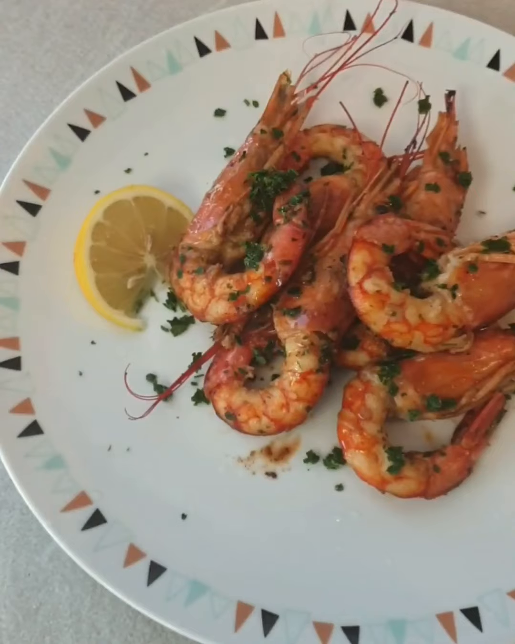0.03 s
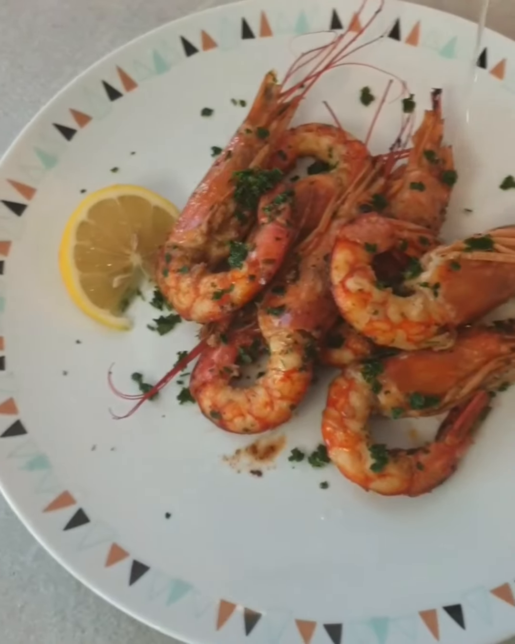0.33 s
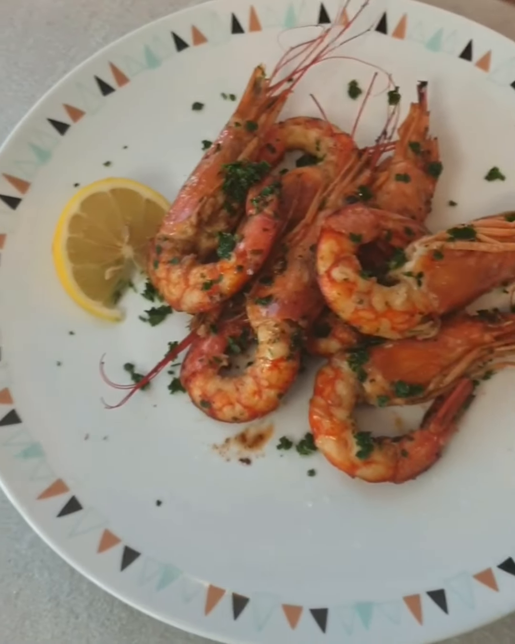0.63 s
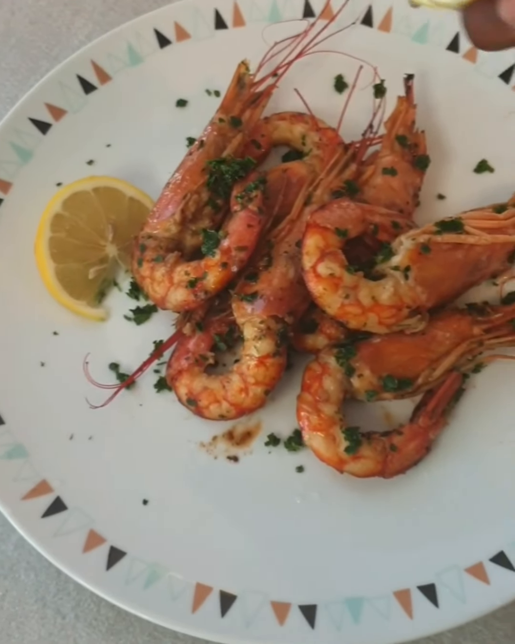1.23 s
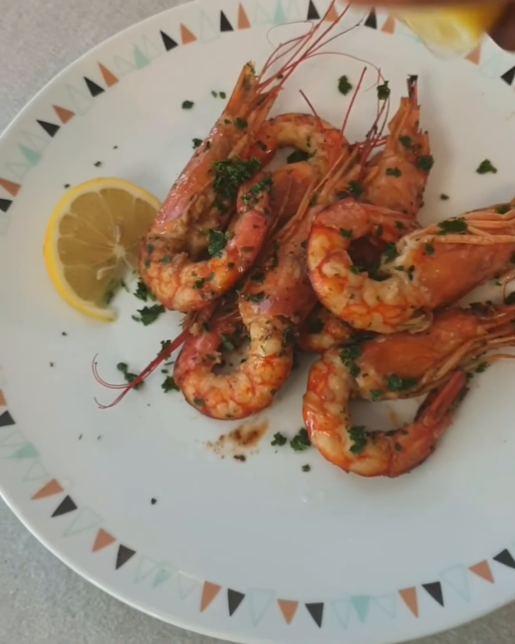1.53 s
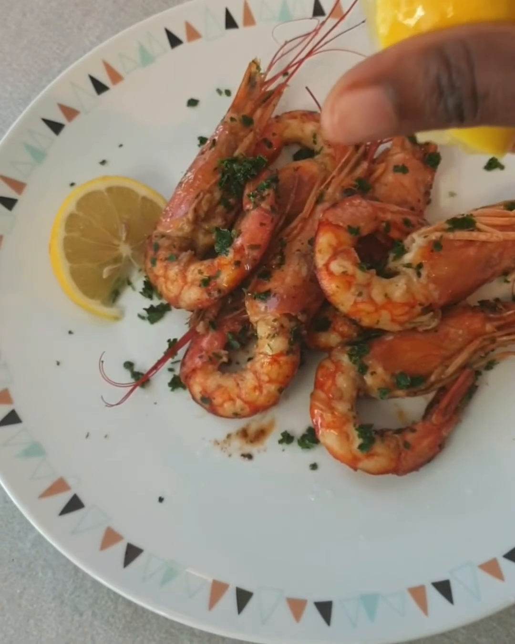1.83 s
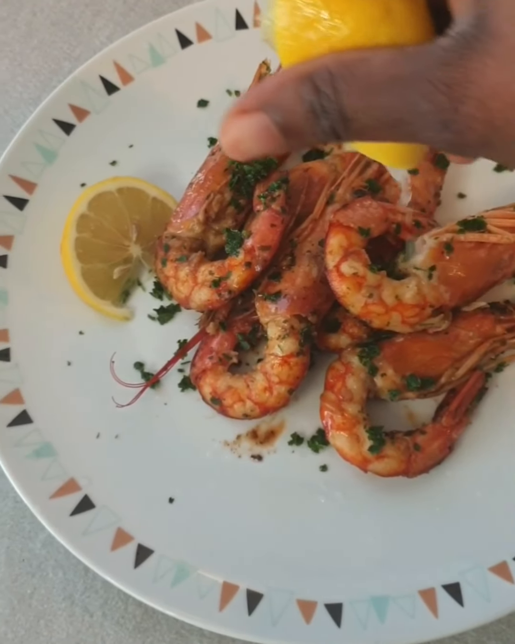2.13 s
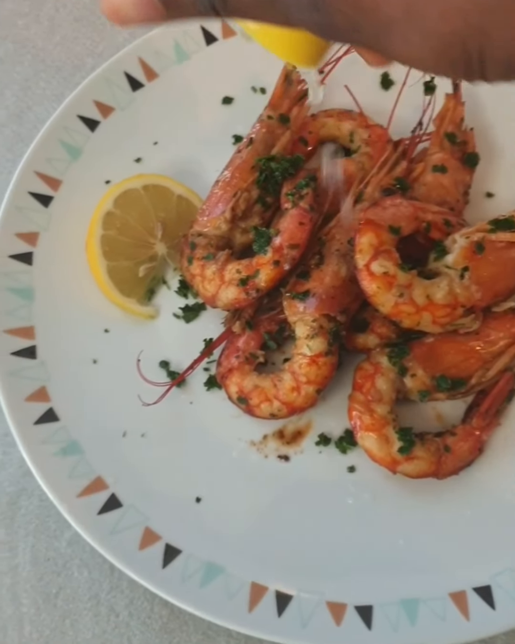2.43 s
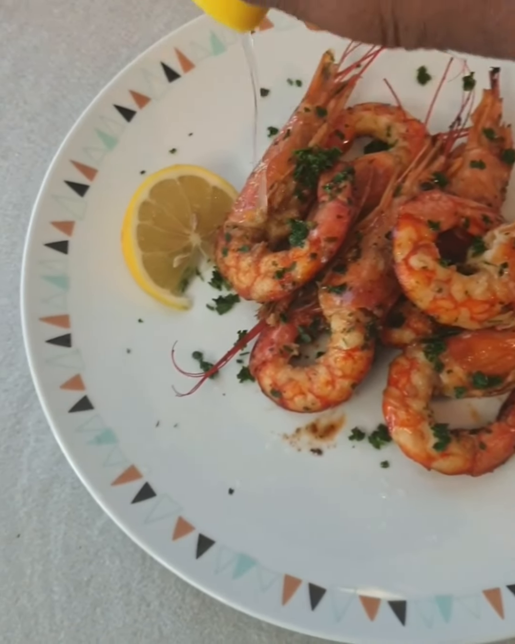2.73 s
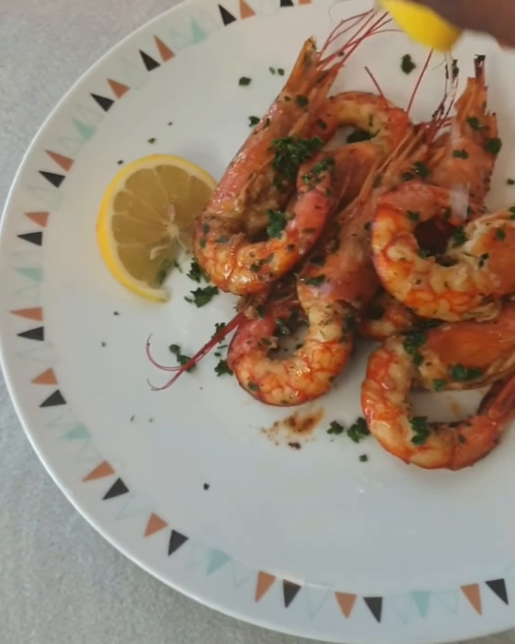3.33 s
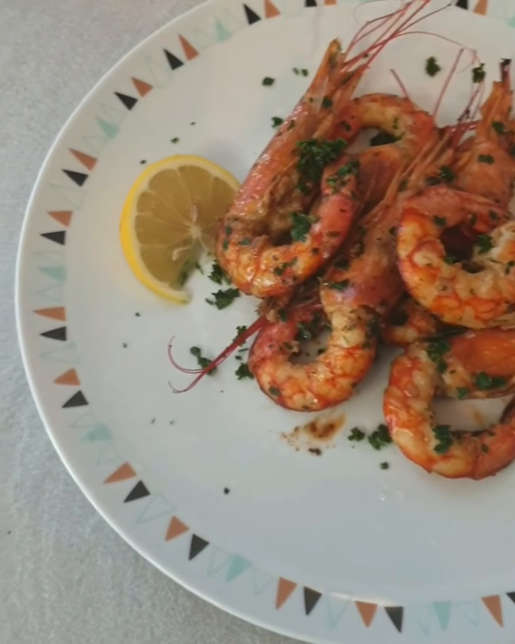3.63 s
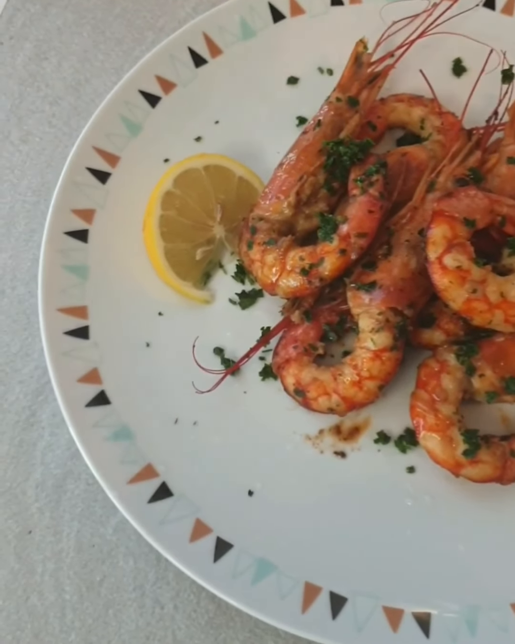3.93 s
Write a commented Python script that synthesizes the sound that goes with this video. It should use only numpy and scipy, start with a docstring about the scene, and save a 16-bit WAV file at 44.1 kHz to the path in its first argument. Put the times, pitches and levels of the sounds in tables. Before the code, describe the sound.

A lemon is squeezed by hand, close up in a quiet kitchen. A short wet spit and pop comes at about 0.9 seconds. From 1.8 to 2.8 seconds the pulp squishes and fizzes softly, with sharper spits near 2.2 and 2.5 seconds and a soft handling bump. A faint trickle and small drips then tick on the food until about 3.8 seconds. A low appliance hum runs throughout.

```python
"""Half a lemon is squeezed by hand over a plate of prawns, close-miked in a quiet kitchen.
Juice cells burst in sharp spits, air and juice fizz through the pulp, and air pockets pop.
Fingers rub the peel and small drops tick on the food; a soft handling rumble and a thin trickle
follow the hardest squeeze. An appliance motor hums throughout over faint room tone."""
import sys
import numpy as np
from scipy import signal
from scipy.fft import rfft, irfft
from scipy.io import wavfile
from scipy.ndimage import uniform_filter1d

SR = 44100
rng = np.random.default_rng(int(sys.argv[2]) if len(sys.argv) > 2 else 0)


def log_audio(samples):
    """Write samples as a 16-bit WAV file to the path given in sys.argv[1]."""
    # one column per channel
    frames = np.atleast_2d(samples).T
    # limit to full scale, then quantise
    limited = np.clip(frames, -1, 1)
    pcm = np.round(limited * 32767).astype(np.int16)
    wavfile.write(sys.argv[1], SR, pcm)


N = 176400


def amp(db):
    """Decibels to gain."""
    return 10 ** (np.asarray(db) / 20)


def unit(x):
    """Scales to rms 1."""
    return x / np.sqrt(np.mean(x ** 2) + 1e-20)


def curve_at(points, hz):
    """Reads a breakpoint curve on a log-frequency axis."""
    point_hz, value = np.transpose(points)
    return np.interp(np.log(hz + 1), np.log(point_hz + 1), value)


def add(mix, start_s, sound, pan_db=0):
    """Places a sound in the mix; positive pan_db leans left."""
    at = round(start_s * SR)
    sound = (sound * amp([[pan_db / 2], [-pan_db / 2]]))[:, max(-at, 0):]
    part = mix[:, max(at, 0):][:, :sound.shape[1]]
    part += sound[:, :part.shape[1]]


def drift(size, step_s):
    """A random modulator that glides to a new value each step."""
    steps = np.arange(size) / SR / step_s
    return np.interp(steps, np.arange(2048), rng.standard_normal(2048))


def stereo(x, likeness=0.24):
    """Blends two unrelated noises into a partly alike left and right."""
    return np.array([x[0], likeness * x[0] + np.sqrt(1 - likeness ** 2) * x[1]])


def resonate(x, centre_hz, width_oct, skirt_db):
    """A resonant peak on a broad skirt that reaches further upward; output at rms 1."""
    hz = np.fft.rfftfreq(x.shape[1], 1 / SR) + 1
    offset_oct = np.log2(hz / centre_hz)
    skirt_oct = np.where(offset_oct > 0, 1.57, 1)
    peak = np.exp(-0.5 * (offset_oct / width_oct) ** 2)
    skirt = amp(skirt_db) * np.exp(-0.5 * (offset_oct / skirt_oct) ** 2)
    return unit(irfft(rfft(x) * (peak + skirt), x.shape[1]))


def spit(centre_hz, width_oct, skirt_db, rise_s, decay_s):
    """A tiny spray of resonant noise: sharp attack, quick decay."""
    t = np.arange(4096) / SR
    envelope = (1 - np.exp(-t / rise_s)) * np.exp(-t / decay_s)
    noise = stereo(rng.standard_normal((2, len(t))))
    return envelope / envelope.max() * resonate(noise, centre_hz, width_oct, skirt_db)


def swell(length_s, skew=1):
    """An arched envelope; skew below 1 brings the crest earlier."""
    return np.sin(np.pi * np.linspace(0, 1, round(length_s * SR)) ** skew)


def motor_hum(shaft_hz=49.37, wander=0.0006, waver_db=0.82):
    """Harmonics of one slightly wandering shaft speed; the upper ones waver more in level."""
    # Hum partials: harmonic, level_db, pan_db
    partials = [(1, -45, 2.06), (2, -60.5, -1.6), (3, -82.5, 8.5), (4, -75, 9.5), (5, -86.5, -12.5),
                (6, -89, -1.5), (12, -81, 4), (13, -92, 8), (14, -96, 11.5)]
    turns = np.cumsum(shaft_hz * (1 + wander * drift(N, step_s=0.312))) / SR
    out = np.zeros((2, N))
    for harmonic, level_db, pan_db in partials:
        level = amp(level_db + waver_db * np.sqrt(harmonic) * drift(N, step_s=0.16))
        tone = np.sqrt(2) * np.cos(2 * np.pi * (harmonic * turns + rng.random()))
        add(out, 0, level * tone, pan_db)
    return out


def room_tone(level_db=-63.5, patch_db=1.0, pan_db=1.2):
    """Room rumble and faint hiss, with patches of the spectrum drifting in level."""
    # Tone colour of the room: frequency_hz, relative_db
    colour = [(20, -0.5), (45, 5.5), (70, 8), (120, 0), (170, -6), (290, -8.5), (440, -20), (600, -15),
              (760, -22.5), (1100, -24), (3000, -27), (7400, -35), (12000, -27.5), (16000, -30)]
    # How alike left and right are: frequency_hz, likeness (0 to 1)
    image = [(30, 1), (120, 0.35), (300, 0.73), (600, 0.17), (1500, 0.1), (5000, 0.1), (15000, 0.1)]
    hz = np.fft.rfftfreq(2048, 1 / SR)[:, None]
    re_a, im_a, re_b, im_b, patches = rng.standard_normal((N // 512 + 5, len(hz), 5)).T
    patches = uniform_filter1d(patches, size=12, axis=0)  # smooth across frequency
    patches = unit(uniform_filter1d(patches, size=8, axis=1))  # then across time
    spectra = stereo([re_a + 1j * im_a, re_b + 1j * im_b], curve_at(image, hz))
    spectra *= amp(curve_at(colour, hz) + patch_db * patches)
    wash = signal.istft(spectra, nperseg=2048, noverlap=1536)[1][:, :N]
    return amp(level_db) * unit(wash) * amp([[pan_db / 2], [-pan_db / 2]])


def finger_rubs(flutter_db=2.5):
    """Fingers rub and squeak softly on the peel in fluttering swells."""
    # Strokes on the peel: start_s, length_s, level_db, centre_hz, width_oct, pan_db
    strokes = [(-.08, .33, -72.5, 2464, 0.063, 4.5), (-.05, 0.16, -74, 620, 0.097, 0),
               (0.658, 0.057, -76, 2530, 0.036, 5), (0.902, 0.23, -70.5, 440, 1, -1),
               (.96, 0.08, -72.5, 884, 0.032, -17), (0.978, 0.42, -79.5, 876, 0.14, -13.5),
               (1.723, 0.84, -70.5, 586, 0.29, -1), (1.948, 0.21, -77, 1680, 0.44, 15),
               (2.15, 0.055, -66, 700, 0.26, -9), (2.489, 0.058, -70.5, 367, 0.85, 5),
               (2.976, 0.15, -76.5, 574, 0.38, -1), (3.181, 0.18, -74, 302, 0.27, -3)]
    out = np.zeros((2, N))
    for start_s, length_s, level_db, centre_hz, width_oct, pan_db in strokes:
        friction = stereo(rng.standard_normal((2, SR)), likeness=0.42)
        rub = resonate(friction, centre_hz, width_oct, skirt_db=-30)
        envelope = swell(length_s, skew=0.69)
        envelope *= amp(level_db + flutter_db * drift(len(envelope), step_s=0.013))
        add(out, start_s, envelope * rub[:, :len(envelope)], pan_db)
    return out


def pulp_fizz(clicks_per_s=3200, spread_db=2.6, fizz_gain=0.99, clump_db=2.4):
    """Air and juice forced through the pulp: clumped micro-clicks and fizz swell with each press."""
    # Squishes: start_s, length_s, level_db, centre_hz, width_oct, pan_db
    squishes = [(.06, .12, -73.5, 2470, 0.24, 6.5), (.08, 0.25, -83, 11100, 0.17, 15),
                (0.915, 0.12, -66, 8900, 1, 2), (0.928, 0.093, -71, 2470, 0.17, 20),
                (1.799, 0.63, -77, 1810, 0.88, 4), (1.849, 0.39, -77, 10700, 0.75, 3),
                (1.968, .07, -69, 4640, 0.31, 4), (2.028, 0.073, -66.5, 3060, 0.26, 10.5),
                (1.992, 0.14, -70.5, 4350, .7, 4), (2.172, 0.14, -74, 4530, 0.89, 16),
                (2.193, 0.28, -66, 10500, 0.3, 0), (2.269, 0.12, -66, 9400, 0.14, 14.5),
                (2.288, 0.17, -69, 5400, .5, -0.5), (2.19, 0.35, -77, 2250, 0.7, 6),
                (2.515, .07, -67.5, 4650, 0.89, 6.5), (2.506, .17, -88, 11200, 0.3, 1),
                (2.556, 0.25, -74, 5150, 1, 8.5), (2.887, .1, -77.5, 5930, 0.21, -4),
                (2.948, 0.63, -83, 11200, 0.86, 6)]
    out = np.zeros((2, N))
    for start_s, length_s, level_db, centre_hz, width_oct, pan_db in squishes:
        hits = rng.random(SR) < clicks_per_s / SR
        strength = amp(spread_db * np.minimum(rng.exponential(1, SR), 4))
        clicks = unit(hits * strength * rng.choice([-1, 1], (2, SR)))
        fizz = fizz_gain * rng.standard_normal((2, SR))
        clumps = amp(clump_db * drift(SR, step_s=0.011))
        squish = resonate(stereo((clicks + fizz) * clumps), centre_hz, width_oct, skirt_db=-31.5)
        envelope = amp(level_db) * swell(length_s, skew=0.63)
        add(out, start_s, envelope * squish[:, :len(envelope)], pan_db)
    return out


def drop_ticks():
    """Single small drops tick on the food."""
    # Drops landing: start_s, level_db, centre_hz, pan_db
    landings = [(.304, -75.5, 5850, -5), (0.504, -68, 12000, 2), (.678, -77, 2350, 3),
                (1.2547, -64, 8360, 14), (1.876, -78, 3380, 2), (1.935, -71, 8300, 18),
                (2.7482, -58.5, 11300, -2), (2.748, -62.5, 5400, -9), (2.8704, -62, 8800, 20),
                (2.8893, -65.5, 6540, 12), (2.9754, -68, 7000, 10), (3.0246, -75, 12900, 2),
                (3.071, -64, 11300, 0), (3.149, -77, 8700, 17), (3.2755, -65, 6290, -1),
                (3.314, -65.5, 9700, 4), (3.512, -72.5, 8100, 18), (3.66, -63, 12100, 0),
                (3.773, -74, 8400, 14), (3.7838, -70, 8000, 13)]
    out = np.zeros((2, N))
    for start_s, level_db, centre_hz, pan_db in landings:
        tick = spit(centre_hz, width_oct=0.14, skirt_db=-23, rise_s=0.00027, decay_s=0.0018)
        add(out, start_s, amp(level_db) * tick, pan_db)
    return out


def juice_bursts():
    """Juice cells burst under the fingers, each with a sharp spit."""
    # Bursting cells: start_s, level_db, decay_s, centre_hz, width_oct, skirt_db, pan_db
    cells = [(0.9034, -63, 0.0089, 5800, 1, -16, 10), (.9168, -48, 0.0048, 12200, 0.89, 5, 5),
             (.917, -50, 0.002, 2610, 0.13, -12, 9), (0.9243, -50, 0.0027, 4960, 0.67, -6, 8),
             (1.6071, -65.5, .002, 1250, 0.36, -15, -5), (2.007, -55, 0.0078, 5900, 0.3, -12, 2),
             (2.1671, -44.5, 0.002, 6460, 0.076, 3, 1), (2.1805, -47, 0.0048, 4400, 0.45, -13, 4),
             (2.181, -52.5, 0.0028, 1820, 0.24, -12, 5.5), (2.3304, -56, 0.0055, 9100, 0.12, -11, 11),
             (2.395, -61.5, 0.0018, 12200, 0.33, -11, 21), (2.4008, -57, 0.0046, 10000, 0.58, -9, 5),
             (2.497, -64, 0.0036, 9200, 0.68, -12, 0), (2.5, -43.5, 0.0021, 11900, 0.16, -9, -1),
             (2.501, -52, 0.0022, 4670, 0.39, -14, 1.5), (2.5684, -58, 0.012, 5300, .15, -15, 0.5),
             (2.6527, -54.5, .003, 5400, 0.13, -5, 3), (2.6916, -62.5, .008, 6900, .6, -12, 6)]
    out = np.zeros((2, N))
    for start_s, level_db, decay_s, centre_hz, width_oct, skirt_db, pan_db in cells:
        burst = spit(centre_hz, width_oct, skirt_db, rise_s=0.00015, decay_s=decay_s)
        add(out, start_s, amp(level_db) * burst, pan_db)
    return out


def bubble_pops(glide=0.068, rasp_gain=0.14):
    """Air pockets in the pulp pop and ring briefly, rising slightly in pitch."""
    # Air pockets: start_s, level_db, pitch_hz, length_s, pan_db
    pockets = [(.9432, -44, 2500, 0.0037, 4), (0.9434, -62, 1680, 0.0042, 16), (1.256, -84, 8160, 0.023, 9),
               (1.605, -67.5, 1400, 0.0087, 11), (1.985, -60, 4460, 0.0092, 7),
               (2.006, -62, 2780, 0.016, 10), (2.053, -57, 3300, 0.0046, 8),
               (2.158, -55, 4420, 0.0088, 6.5), (2.1784, -43, 2395, 0.0057, 10.5),
               (2.568, -60, 5660, 0.013, -11), (2.655, -71.5, 3870, .03, 19)]
    out = np.zeros((2, N))
    for start_s, level_db, pitch_hz, length_s, pan_db in pockets:
        envelope = amp(level_db) * swell(length_s)
        rising_hz = pitch_hz * (1 + glide * np.linspace(-0.5, 0.5, len(envelope)))
        tone = np.sin(2 * np.pi * np.cumsum(rising_hz) / SR)
        rasp = resonate(rng.standard_normal((2, SR // 10)), pitch_hz, width_oct=0.27, skirt_db=-16)
        add(out, start_s, envelope * (tone + rasp_gain * rasp[:, :len(tone)]), pan_db)
    return out


def handling_rumble():
    """Soft low bumps, nearly mono, as the hand shifts."""
    # Handling bumps: start_s, length_s, level_db, centre_hz
    bumps = [(2.5, 0.13, -61, 190), (2.54, 0.13, -51, 93), (2.62, 0.13, -61, 128), (2.8, 0.038, -54, 117)]
    out = np.zeros((2, N))
    for start_s, length_s, level_db, centre_hz in bumps:
        noise = stereo(rng.standard_normal((2, SR)), likeness=0.97)
        thud = resonate(noise, centre_hz, width_oct=0.4, skirt_db=-22.5)
        envelope = amp(level_db) * swell(length_s)
        add(out, start_s, envelope * thud[:, :len(envelope)], pan_db=0.5)
    return out


def trickle(count=133, around_s=3.19, spread_s=0.39, level_db=-79.5, pitch_hz=6340, decay_s=0.0024):
    """A thin trickle on the food: faint pings from droplets of nearly one size."""
    out = np.zeros((2, N))
    t = np.arange(1024) / SR
    for when, offset_db, detune, side in rng.uniform(-1.1, 1, (count, 4)):
        ping = np.sin(2 * np.pi * pitch_hz * (1 + 0.11 * detune) * t) * np.exp(-t / decay_s)
        add(out, around_s + spread_s * when, amp(level_db + offset_db) * ping, pan_db=5.6 * side)
    return out


def kitchen_reverb(x, early_db=-3.5, early_decay_s=0.0064, echoes_per_s=1500, tail_db=-4.5, cross=0.17):
    """Early reflections from plate and table, then a short bright tail."""
    # Reverb time of the kitchen: frequency_hz, t60_s
    decay_times = [(200, 0.54), (2500, 0.43), (7000, 0.52), (15000, 0.43)]
    hz, frame_s, spectra = signal.stft(rng.standard_normal((2, SR // 2)), SR, nperseg=256)
    decay = amp(-60 * frame_s / curve_at(decay_times, hz)[:, None])
    tail = signal.istft(spectra * decay, SR, nperseg=256)[1]
    t = np.arange(tail.shape[1]) / SR
    tail *= np.minimum(t / 0.013, 1)  # 13 ms fade-in
    early = rng.standard_normal(tail.shape) * (rng.random(tail.shape) < echoes_per_s / SR)
    early *= np.exp(-t / early_decay_s) * (t > 0.001)  # silent for the first 1 ms
    response = sum(amp(db) * part / np.linalg.norm(part, axis=1, keepdims=True)
                   for db, part in [(tail_db, tail), (early_db, early)])
    send = (1 - cross) * x + cross * x[::-1]  # the walls return some of each side to the other
    return signal.fftconvolve(send, response, axes=1)[:, :N]


def spaced_mics(x, lag_s=0.00014):
    """The right microphone hears the lemon slightly later than the left."""
    delay = np.exp(-2j * np.pi * np.fft.rfftfreq(N, 1 / SR) * lag_s)
    return np.array([x[0], irfft(rfft(x[1]) * delay, N)])


def scene():
    """Close juice sounds and their reverb over a bed of hum, room tone and hand noise."""
    bed = motor_hum() + room_tone() + handling_rumble() + finger_rubs()
    juice = juice_bursts() + pulp_fizz() + drop_ticks()
    pops = bubble_pops()
    reverb = kitchen_reverb(juice + amp(-9) * pops)
    return spaced_mics(juice + pops) + reverb + trickle() + bed


def record(dry):
    """A steep low-pass trims the very top of the treble."""
    lowpass = signal.firwin(511, cutoff=15900, window=("kaiser", 9), fs=SR)
    return signal.oaconvolve(dry, lowpass[None], "same")


dry = scene()
out = record(dry)
log_audio(out)
```